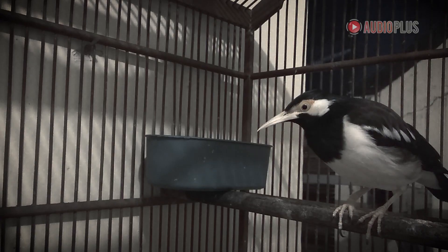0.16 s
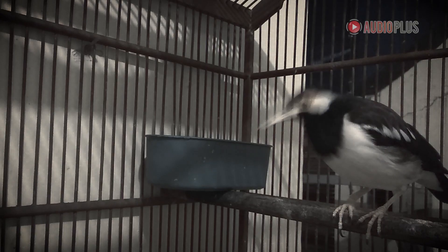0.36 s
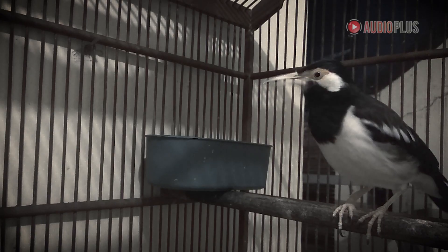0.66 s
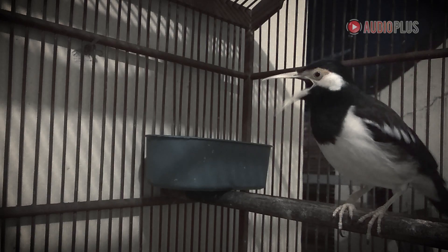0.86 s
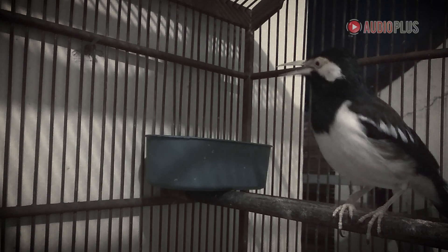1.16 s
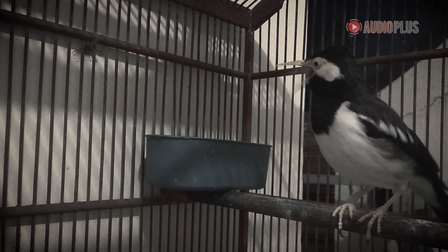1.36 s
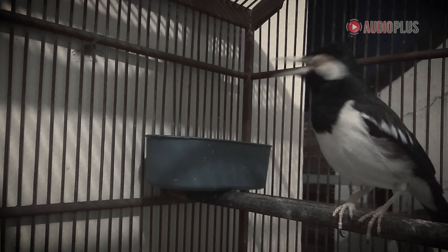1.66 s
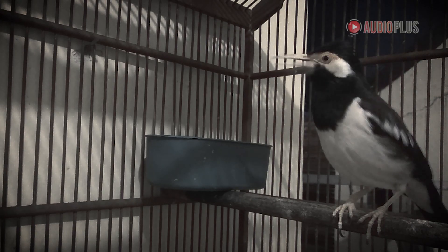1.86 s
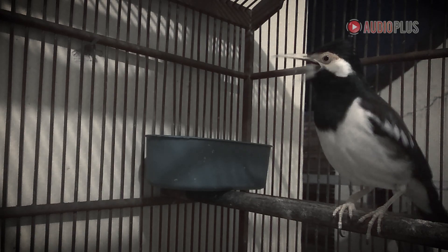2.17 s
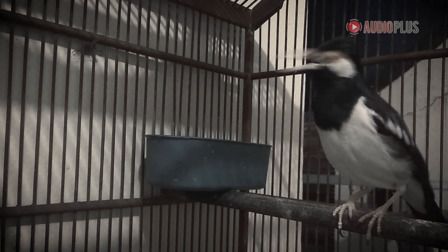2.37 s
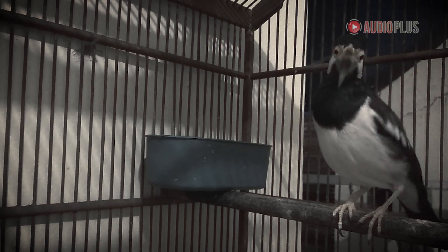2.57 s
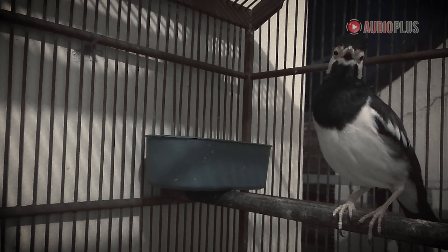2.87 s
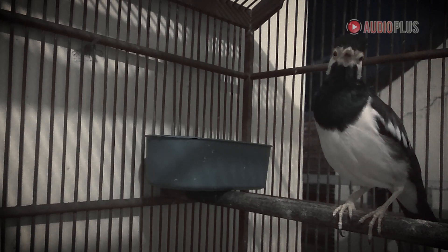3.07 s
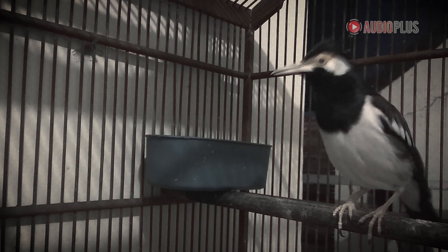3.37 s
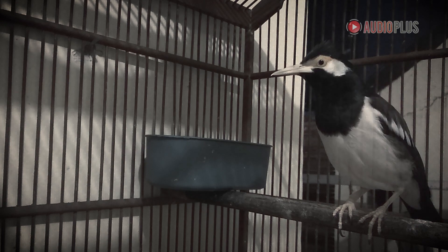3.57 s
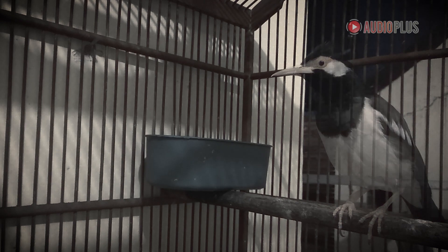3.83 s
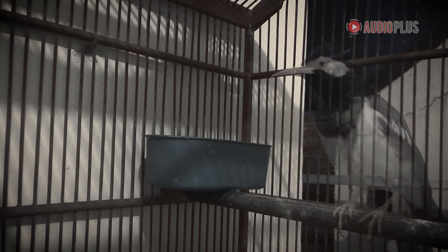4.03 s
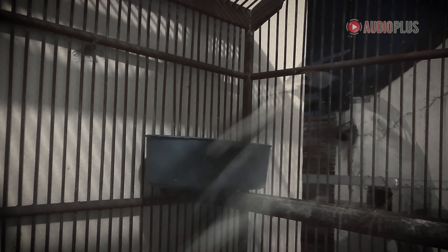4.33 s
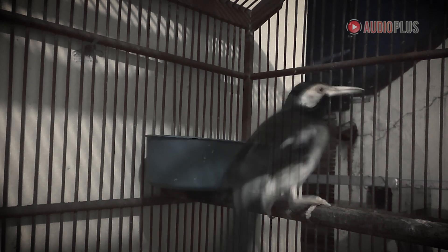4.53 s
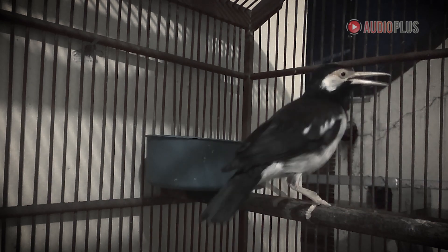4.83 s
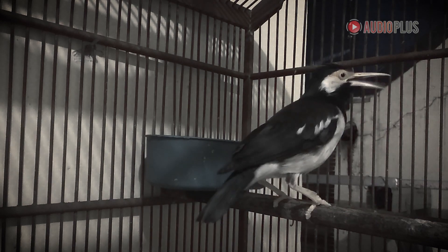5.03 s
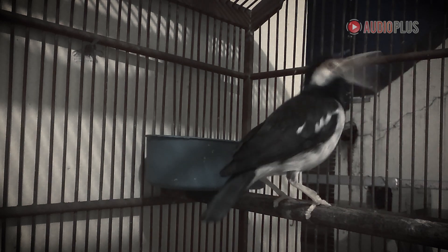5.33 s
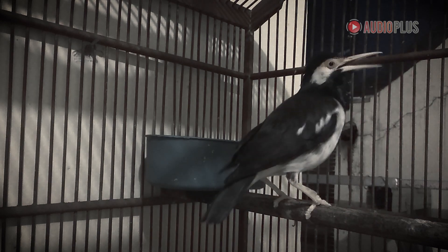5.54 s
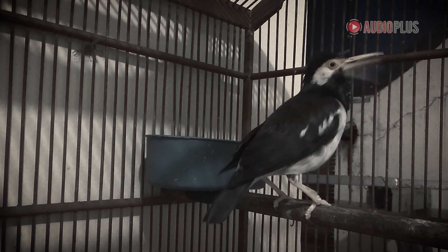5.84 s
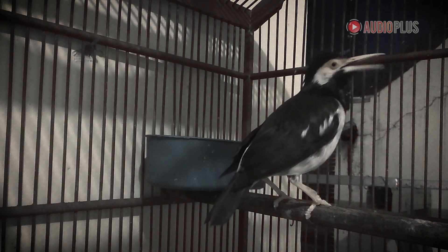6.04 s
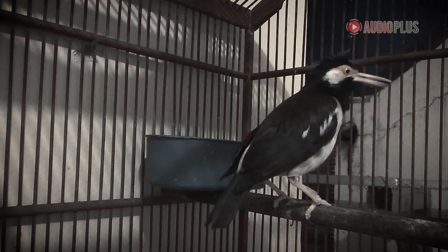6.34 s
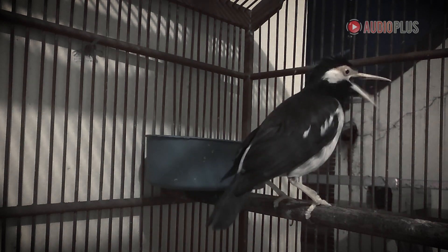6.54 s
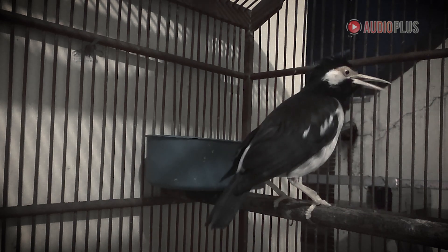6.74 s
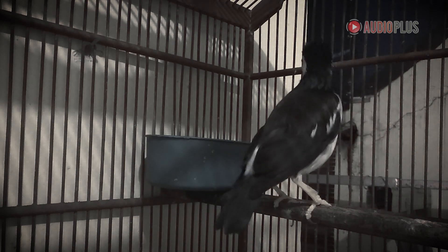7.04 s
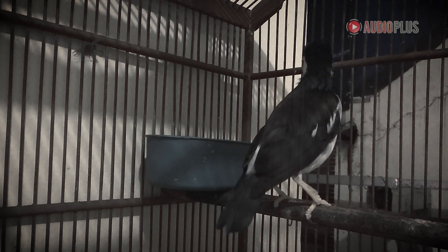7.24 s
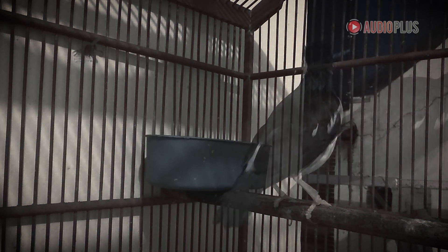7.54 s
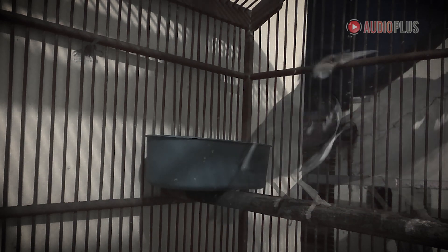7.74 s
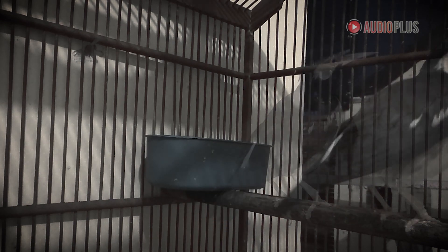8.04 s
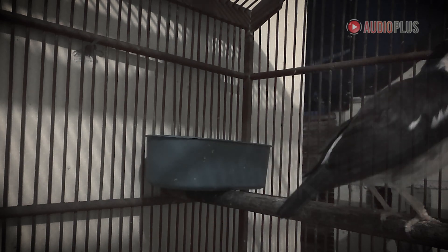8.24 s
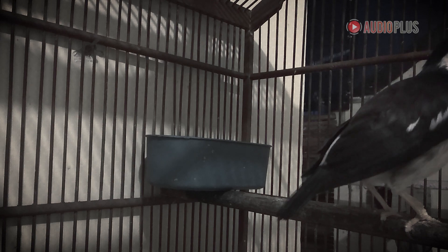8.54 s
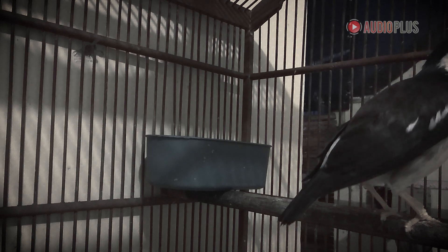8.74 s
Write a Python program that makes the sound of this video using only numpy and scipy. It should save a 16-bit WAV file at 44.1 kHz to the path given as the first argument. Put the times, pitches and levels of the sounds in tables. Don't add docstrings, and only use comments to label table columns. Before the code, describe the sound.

A caged starling sings loudly in a hard echoing room, repeating one piercing high note and two low buzzy trills over faint traffic.

```python
import sys
import numpy as np
from scipy import signal
from scipy.fft import rfft, irfft, next_fast_len
from scipy.io import wavfile
from scipy.ndimage import uniform_filter1d, map_coordinates

SR = 44100
rng = np.random.default_rng(int(sys.argv[2]) if len(sys.argv) > 2 else 0)


def unload_audio(sound):
    columns = np.transpose(np.atleast_2d(sound))
    steps = np.round(np.clip(columns, -1, 1) * 32767)
    wavfile.write(sys.argv[1], SR, steps.astype(np.int16))


def voltage_ratio(decibels):
    exponent = np.asarray(decibels, float) / 20
    return 10 ** exponent


N = 392490
LEAD_IN = SR


def unit(x):
    return x / np.sqrt(np.mean(x ** 2) + 1e-20)


def along(points, hz):
    f, v = np.transpose(points)
    return np.interp(np.log(hz + 1), np.log(f + 1), v)


def wobble(size, rate_hz):
    knots = rng.standard_normal(int(size * rate_hz / SR) + 4)
    return map_coordinates(knots, [np.arange(size) * rate_hz / SR])


# (frequency [Hz], density [dB per Hz])
TOWN_SPECTRUM = [(25, -41.5), (60, -19), (120, -5), (170, 2), (260, -9.5), (400, -6), (620, -2.5),
                 (760, -10.5), (900, -15), (1500, -26), (2500, -40.5), (4000, -120)]
# (time [s], level [dB])
TOWN_LEVEL = [
    (0.0, -64.5),
    (0.3, -63),
    (0.62, -51.5),
    (2, -57),
    (4, -56),
    (5.4, -54),
    (7.298, -59),
    (8.9, -53),
]
# (frequency [Hz], correlation [0-1])
TOWN_LIKENESS = [(60, .94), (130, .9), (300, 0.86), (630, 0.35), (1400, .1)]


def town():
    patchy_db, left_db = 4, 1.5
    size = next_fast_len(N)
    hz = np.fft.rfftfreq(size, 1 / SR)
    z = signal.stft(rng.standard_normal((2, size)), nperseg=2048)[2]
    patches = uniform_filter1d(rng.standard_normal(z.shape[1:]), size=2, axis=0)
    patches = uniform_filter1d(patches, size=8, axis=1)
    noise = signal.istft(z * voltage_ratio(patchy_db * unit(patches)), nperseg=2048)[1]
    turn = np.arccos(np.clip(along(TOWN_LIKENESS, hz), -1, 1)) / 2
    spectrum = rfft(noise, size) * voltage_ratio(along(TOWN_SPECTRUM, hz)) * [np.cos(turn), np.sin(turn)]
    mid, side = irfft(spectrum, size)[:, :N]
    level_db = np.interp(np.arange(N) / SR, *np.transpose(TOWN_LEVEL)) + 2.9 + 1.3 * wobble(N, 6)
    return voltage_ratio(level_db) * unit(np.array([voltage_ratio(left_db) * (mid + side), mid - side]))


# (frequency [Hz], t60 [s])
ROOM_DECAY = [(500, 0.42), (2000, 0.38), (4000, 0.86), (8000, 0.59), (14000, 0.52)]
# (frequency [Hz], t60 [s])
HALL_DECAY = [(500, 1.1), (1500, 1.57), (3000, 1.07), (5000, 0.73), (14000, 0.12)]
# (frequency [Hz], gain [dB])
WET_COLOUR = [(1000, 3), (2500, 3), (5000, 0.5), (9000, 2), (14000, 3)]


def tails(count, wet_db, hall_db=-17):
    hz, t, z = signal.stft(rng.standard_normal((count, 2, SR)), SR, nperseg=256)
    room = voltage_ratio(-60 * t / along(ROOM_DECAY, hz)[:, None])
    hall = voltage_ratio(hall_db - 60 * t / along(HALL_DECAY, hz)[:, None])
    z = z * (room + hall) * voltage_ratio(along(WET_COLOUR, hz))[:, None]
    tail = signal.istft(z, SR, nperseg=256)[1][..., :SR]
    tail *= np.clip(np.arange(SR) / SR / 0.02, 0, 1)
    return tail * voltage_ratio(wet_db) / np.linalg.norm(tail, axis=-1, keepdims=True)


def echoes(x, rooms, walls_db):
    tail = rooms[rng.integers(len(rooms))].copy()
    for side in tail:
        side[rng.integers(120, 1300, size=7)] += voltage_ratio(walls_db) * rng.standard_normal(size=7)
    wet = signal.fftconvolve(x, tail, axes=1)
    wet[:, :x.shape[1]] += x
    return wet


def add(song, start_s, x):
    place = song[:, LEAD_IN + round(start_s * SR):][:, :x.shape[1]]
    place += x[:, :place.shape[1]]


def flick_times(length_ms, rule, count):
    first_ms, last_ms, hurry, tops_hz = rule
    u = np.linspace(0, 1, count)
    times_ms = first_ms + (length_ms - last_ms - first_ms) * (u + hurry * u * (1 - u))
    return zip(times_ms, tops_hz)


PARTIALS = {"high": [3, -11.5, -11.5, -15.5], "short": [-1.5, -2, -5, -5.5, -4, -2, -8.5, -1, -4, -3.5],
            "long": [1, 1, -12.5, -2.5, -1.5, 1.5, -10, 2, -0.5, -6], "opening": [-2.5, 0.5, -5.5, -1.5,
            -18, -11], "sweep": [2, -7.5, -14, -29.5], "warble": [1, -19.5, -28.5, -29.5, -38, -37, -33,
            -29], "plain": [-1, -36, -23, -42]}
# (frequency [Hz], gain [dB])
THROAT = [(900, -15.5), (1300, -4.5), (2100, 0), (2800, 0.5), (3500, 0.06), (4500, -2.5), (5800, -2),
          (8000, 5), (11000, 4.5), (14000, -7.5), (15000, -32)]
# (time [s], lag [ms])
LEFT_LAG = [(0, -0.039), (3.2, -0.078), (4.2, -0.08), (7.2, -0.092), (7.9, -0.19)]
# (frequency [Hz], level [dB])
BRIGHT_SIDE = [(3000, 2), (8000, 5), (14000, 15.5)]
# (time [s], level [dB])
BRIGHTNESS = [(0, 2), (3.3, 1.5), (4.2, -1), (7.2, 0), (7.9, -1)]


def syllable(row, kind, path, goal_hz, flicks=None, shape=None, throat=THROAT, flick_db=0, flick_dim_db=0,
             breathy=.3, ms_per_flick=None):
    start, end, first_hz, db, pan_db = row
    ms = np.arange(round((end - start) * SR)) * 1e3 / SR
    size, length_ms = len(ms), ms[-1]
    at, way, factor, effort_db = np.transpose(path)
    inner = np.where(at[1:-1] < 0, length_ms + at[1:-1], at[1:-1])
    at = np.maximum.accumulate(np.r_[0, inner, length_ms])

    def glide(values):
        return uniform_filter1d(np.interp(ms, at, values), size=60, mode="nearest")

    pitch = (first_hz + (goal_hz - first_hz) * glide(way)) * glide(factor)
    lift = np.zeros(size)
    if flicks:
        count = len(flicks[-1])
        if ms_per_flick:
            count = round((length_ms - 50) / ms_per_flick)
        for top_ms, top_hz in flick_times(length_ms, flicks, count):
            flick = uniform_filter1d(np.interp(ms - top_ms, *np.transpose(shape)), size=40)
            pitch = pitch + (top_hz - pitch) * flick
            lift = lift + flick
    level_db = db + glide(effort_db) + 2.45 * wobble(size, 150) + flick_db * lift
    pitch = pitch * (1 + 0.0058 * wobble(size, 400))
    phase = 2 * np.pi * np.cumsum(pitch) / SR
    side = np.array([[.5], [-.5]])
    lag_s = np.interp(start, *np.transpose(LEFT_LAG)) / 1e3
    facing_db = np.interp(start, *np.transpose(BRIGHTNESS))
    out = 0
    for k, partial_db in enumerate(PARTIALS[kind], start=1):
        hz = k * pitch
        side_db = side * (pan_db + along(BRIGHT_SIDE, hz))
        gain = voltage_ratio(partial_db + along(throat, hz) + side_db) * (hz < SR / 2.5)
        if k > 1:
            gain = gain * voltage_ratio(facing_db * (hz > 5000) - flick_dim_db * lift)
        flutter = breathy * max(k - 2, 0) * wobble(size, 1500)
        out = out + gain * np.sin(k * phase - 2 * np.pi * hz * lag_s * side + k * k + flutter)
    edge = np.clip(np.minimum(ms, length_ms - ms) / 0.9, 0, 1)
    return np.sqrt(2) * out * voltage_ratio(level_db) * edge


def sing(song, rooms, rows, *voice, **manner):
    for row in rows:
        add(song, row[0], echoes(syllable(row, *voice, **manner), rooms, walls_db=-16.0))


# (time from start, or from end if < 0 [ms], way to goal [share], pitch factor [1], effort [dB])
WHISTLES = [
    (-.5, -.45, 2657, -22.5, 0),
    (7.203, 7.246, 2664, -13.5, 0),
]
PLAIN_GLIDE = [(0, 0, 1.3, -15), (1, .2, 1.01, 0), (-2, 1.01, 1.01, 2.5), (0, 1.01, 1.01, -12)]


def whistle(song, rooms):
    sing(song, rooms, WHISTLES, "plain", PLAIN_GLIDE, 2570)


OPENINGS = [
    (.386, .408, 2040, -18.5, 0),
    (4.202, 4.219, 1930, -31, 0.0036),
    (7.889, 7.911, 2115, -22, 0),
]
OPENING_GLIDE = [(0, 0.072, .97, -19.5), (6.5, 0.51, 1.01, -2.5), (-6, 1.01, 1.01, 0.5),
                 (0, 0.93, 1.01, -3)]


def opening(song, rooms):
    sing(song, rooms, OPENINGS, "opening", OPENING_GLIDE, 2280, breathy=.05)


SWEEPS = [
    (.409, .466, 4440, -10.5, 0),
    (4.223, 4.275, 4304, -10.5, 0),
    (7.912, 7.97, 4624, -9, 0),
]
SWEEP_GLIDE = [(0, 0, 1.2, -1), (2, 0.094, 1.01, -0.3), (15, .5, 1.01, -1.1), (28.5, .86, 1.01, -1.3),
               (-13.5, 1.08, .97, -8), (-8.5, 1.01, 1.08, 1.5), (0, 1.5, 1.05, -13)]


def sweep(song, rooms):
    sing(song, rooms, SWEEPS, "sweep", SWEEP_GLIDE, 2700)


WARBLES = [
    (.537, .7, 1514, -10, -0.62),
    (4.35, 4.515, 1518, -15, 1),
    (8.04, 8.21, 1480, -13.5, -0.0048),
]
WARBLE_GLIDE = [(0, 0.094, .72, -11.5), (14.5, 0, .98, -4.5), (24.5, 0.018, 1.01, -2),
                (60.5, .7, 1.01, -0.5), (-51.5, 1.01, 1.01, 1), (-42, 0.1, .95, -5), (-24, 0.1, 0.93, -9),
                (-13.5, 0.048, .75, -5), (0, 0, .75, -12)]
# (first after start [ms], last before end [ms], hurry [0-1], tops [Hz])
WARBLE_FLICKS = (17, 23, 0, [2710, 2739, 2744, 2595, 2030])
# (time from top [ms], height [share])
SHARP = [(-6, 0.0032), (-4, .2), (-0.5, 0.93), (0.5, 0.98), (1, 0.97), (3.5, .2), (6, 0.0016)]


def warble(song, rooms):
    sing(song, rooms, WARBLES, "warble", WARBLE_GLIDE, 1670, WARBLE_FLICKS, SHARP,
         flick_db=-14, flick_dim_db=3)


PIPS = [
    (.756, .764, 2293, -27, 0.0056),
    (4.579, 4.587, 2350, -33.5, 0),
    (8.266, 8.274, 2290, -36.5, 0),
]


def pip(song, rooms):
    sing(song, rooms, PIPS, "sweep", SWEEP_GLIDE, 2710)


HIGH_NOTES = [(0.765, 0.837, 3294, -11.5, -0.4), (1.366, 1.45, 3320, -12, -3.5),
              (1.965, 2.059, 3274, -12, -1.7), (2.59, 2.685, 3280, -12, -1),
              (4.588, 4.665, 3425, -10.5, -0.5), (5.218, 5.302, 3260, -11.5, 0.5),
              (5.828, 5.921, 3242, -12, -0.3), (6.446, 6.543, 3270, -13, 0.7), (7.087, 7.201, 3248, -12, 0),
              (8.275, 8.344, 3304, -11, 1), (8.893, 8.977, 3268, -14, 2)]
HIGH_GLIDE = [(0, 0, 1.6, -11), (3, 0.087, 1.42, -2.5), (6.5, 0, 1.01, 3), (22, .15, 1.01, -0.5),
              (38.5, .8, 1.01, 1.5), (-12.5, 1.01, 1.01, -3), (0, 1.01, 0.92, -5.5)]
# (first after start [ms], last before end [ms], hurry [0-1], tops [Hz])
HIGH_FLICKS = (32, 12, .47, [5720, 5506, 5200, 4730, 4500])


def high_note(song, rooms):
    sing(song, rooms, HIGH_NOTES, "high", HIGH_GLIDE, 3570, HIGH_FLICKS, SHARP,
         flick_db=-3, flick_dim_db=4, breathy=.4, ms_per_flick=12)


SHORT_TRILLS = [(0.913, 1.036, 1416, -12.5, -3), (1.522, 1.645, 1424, -11.5, 0.7),
                (2.129, 2.25, 1419, -12, 0.5), (2.771, 2.896, 1376, -12.5, -1.5),
                (4.743, 4.866, 1335, -14, -0.5), (5.38, 5.501, 1376, -12.5, -1),
                (5.991, 6.116, 1390, -12, -0.05), (6.624, 6.747, 1336, -14, -1),
                (8.427, 8.551, 1380, -12.5, 1)]
SHORT_GLIDE = [(0, 0, 0.81, -8), (12.5, 0, 1.01, -5.5), (31.5, 0, .96, 0), (-46, 0.046, .98, -0.4),
               (-27.5, 0.59, 1.01, 4), (-16, 1.01, 0.91, -0.8), (-11.5, 2.1, 1.01, -16),
               (0, 1.01, 1.01, -35)]
# (first after start [ms], last before end [ms], hurry [0-1], tops [Hz])
SHORT_FLICKS = (18, 35, 0, [2850, 2850, 2850])
# (time from top [ms], height [share])
SLOW = [(-16, 0.014), (-4.5, .08), (-2, .5), (0, 0.98), (2.5, .62), (5, .5), (9, .12), (19, 0)]
# (frequency [Hz], gain [dB])
NARROW = [(900, -7.5), (1300, -11), (1700, -8), (2050, 2.5), (2450, -3.5), (2850, -6.5), (3600, -6.5),
          (4500, -17.5), (5500, -13.5), (7000, -16.5), (9000, -18), (12000, -22), (14500, -31.5)]


def short_trill(song, rooms):
    sing(song, rooms, SHORT_TRILLS, "short", SHORT_GLIDE, 2240, SHORT_FLICKS, SLOW, NARROW,
         flick_db=5.5, flick_dim_db=7)


LONG_TRILLS = [(1.09, 1.308, 1320, -13.5, -1.4), (1.698, 1.917, 1330, -14, 0.66),
               (2.315, 2.534, 1312, -14.5, 0.93), (2.964, 3.181, 1334, -16, -1),
               (4.931, 5.154, 1312, -15.5, 0.21), (5.56, 5.779, 1354, -14.5, 1.4),
               (6.181, 6.404, 1314, -18, 0.63), (6.818, 7.041, 1305, -19, -0.1),
               (8.612, 8.834, 1347, -13.5, 0.99)]
LONG_GLIDE = [(0, 0.14, .7, -14.5), (14, 0, 0.94, -3.5), (41, .1, 1.01, 0.9), (-60, 1.01, 1.01, -0.5),
              (-40, 1.01, 0.86, -6), (-21, 1.01, 0.86, -7), (-11, 0.9, .82, -9.5), (0, 1.01, .84, -15.5)]
# (first after start [ms], last before end [ms], hurry [0-1], tops [Hz])
LONG_FLICKS = (20, 30, .06, [2824, 2864, 2854, 2850, 2802, 2390])


def long_trill(song, rooms):
    sing(song, rooms, LONG_TRILLS, "long", LONG_GLIDE, 1345, LONG_FLICKS, SLOW, NARROW,
         flick_db=5.5, flick_dim_db=7)


# (time [s], peak level [dB])
TICKS = [
    (3.752, -62),
    (3.8435, -48),
    (3.9167, -33.5),
    (3.931, -37),
]


def claw_ticks(song, rooms):
    t = np.arange(SR // 20) / SR
    for start_s, db in TICKS:
        noise = np.diff(rng.standard_normal((2, len(t) + 2)), n=2)
        scratch = noise * voltage_ratio(db - 5.5 - 60 * t / 0.033)
        add(song, start_s, echoes(scratch, rooms, walls_db=-14.0))


def scene():
    song, rooms = np.zeros((2, N + LEAD_IN)), tails(count=8, wet_db=-3.5)
    for part in (whistle, opening, sweep, warble, pip, high_note, short_trill, long_trill, claw_ticks):
        part(song, rooms)
    return song[:, LEAD_IN:] + town()


def suppressor(x):
    from_hz, under_db, depth_db = 4200, -1.24, -28.5
    hz, _, z = signal.stft(x, SR, nperseg=1024)
    power = uniform_filter1d(np.sum(np.abs(z) ** 2, axis=0), size=5, axis=1)
    near_db = 10 * np.log10(np.abs(uniform_filter1d(power, size=5, axis=0)) + 1e-20)
    weak = near_db < uniform_filter1d(near_db, size=31, axis=0) + under_db
    shut = weak & (hz[:, None] > from_hz)
    return signal.istft(z * voltage_ratio(depth_db * shut), SR, nperseg=1024)[1][:, :N]


def band_limit(x):
    return signal.sosfilt(signal.butter(12, 15290, fs=SR, output="sos"), x)


# (centre [Hz], width [Hz], depth [0-1])
NOTCHES = [(6080, 350, 0.3), (8890, 110, 0.39), (11990, 500, 0.4)]


def record(dry):
    balance_db, ceiling, low_cut_hz, top_hz, headroom_db = -1.82, .9, 56, 14600, -0.17
    x = dry * voltage_ratio([[balance_db - .6], [-.6]])
    x = x / (1 + np.abs(x / ceiling) ** 8) ** (1 / 8)
    size = next_fast_len(N)
    hz = np.fft.rfftfreq(size, 1 / SR)
    colour = hz ** 2 / (hz ** 2 + low_cut_hz ** 2) / (1 + (hz / top_hz) ** 40)
    for centre_hz, width_hz, depth in NOTCHES:
        colour = colour * (1 - np.clip(depth, 0, 1) * np.exp(-((hz - centre_hz) / width_hz) ** 2))
    x = irfft(rfft(x, size) * colour, size)[:, :N]
    return band_limit(suppressor(x) * voltage_ratio(headroom_db))


dry = scene()
out = record(dry)
unload_audio(out)
```